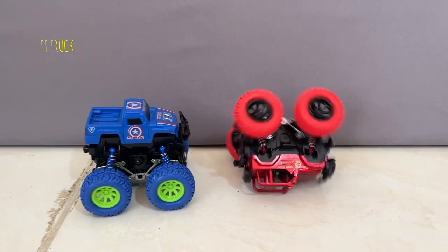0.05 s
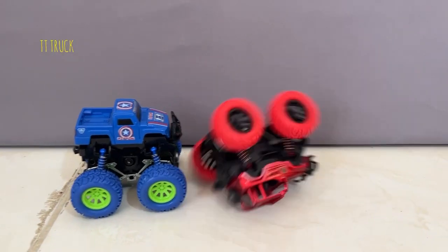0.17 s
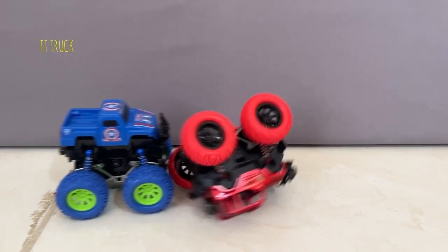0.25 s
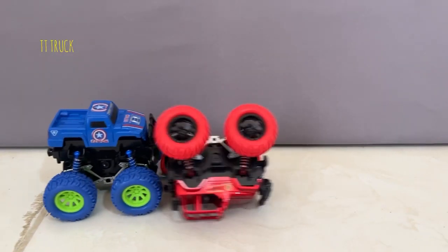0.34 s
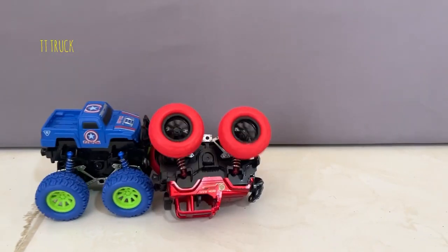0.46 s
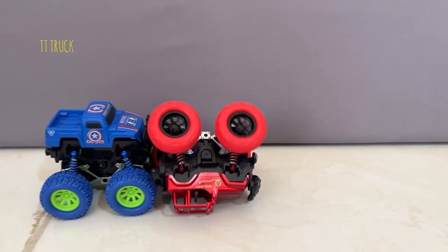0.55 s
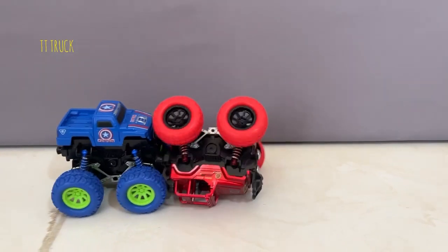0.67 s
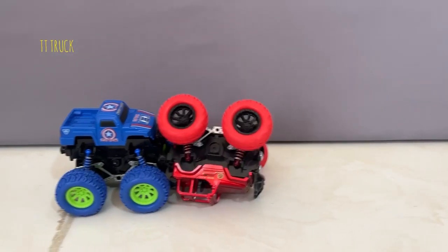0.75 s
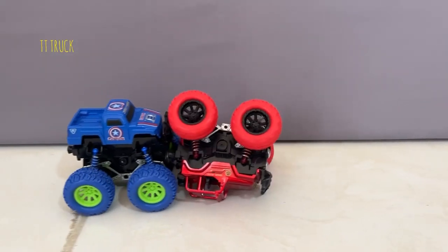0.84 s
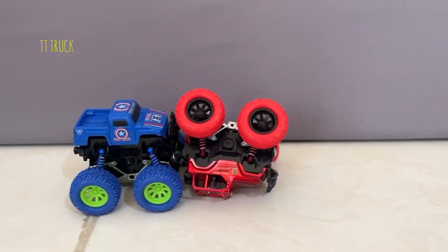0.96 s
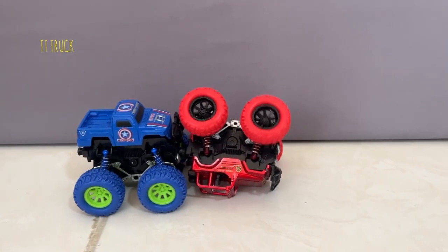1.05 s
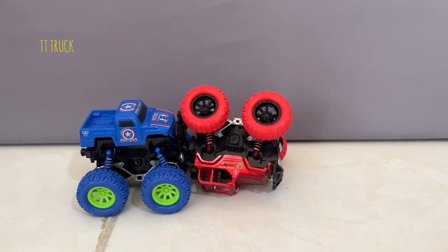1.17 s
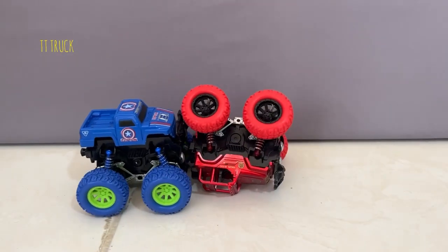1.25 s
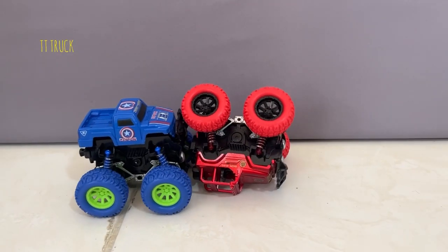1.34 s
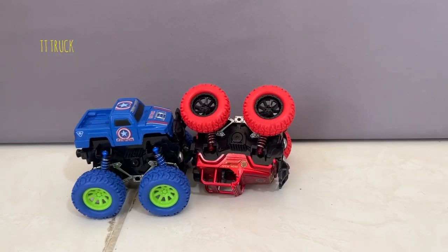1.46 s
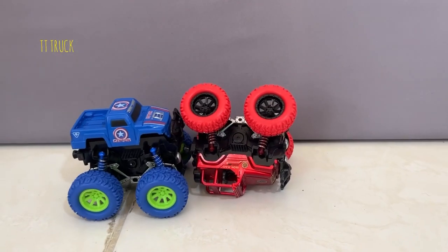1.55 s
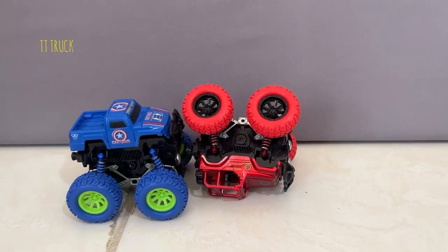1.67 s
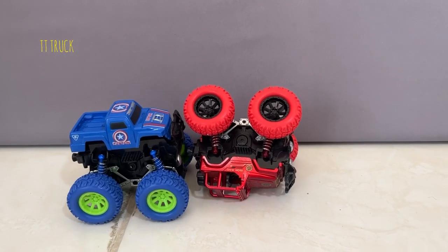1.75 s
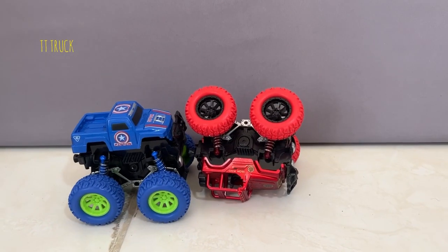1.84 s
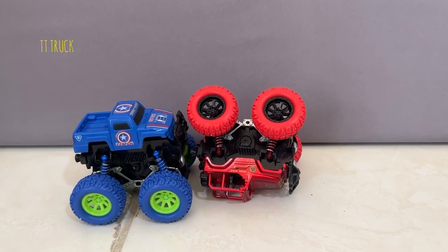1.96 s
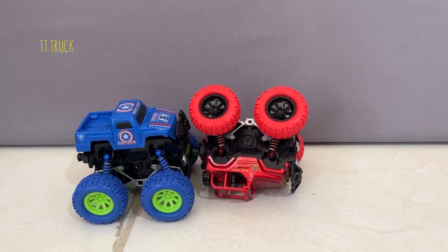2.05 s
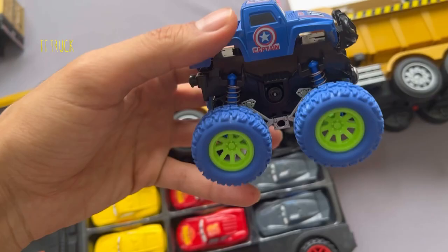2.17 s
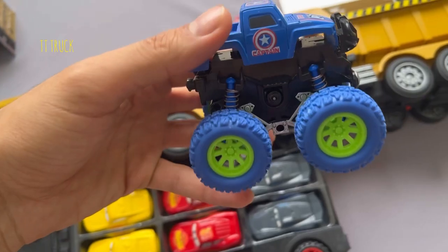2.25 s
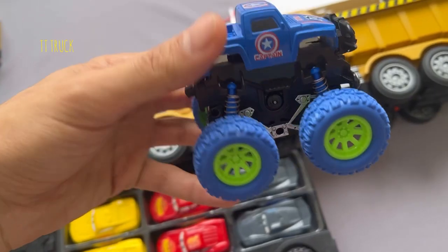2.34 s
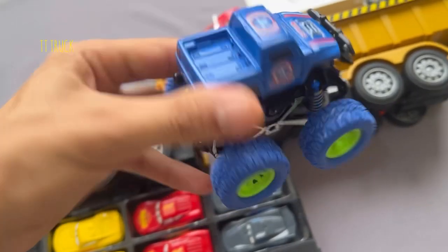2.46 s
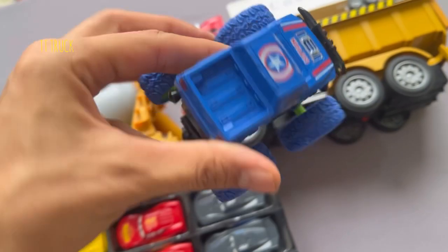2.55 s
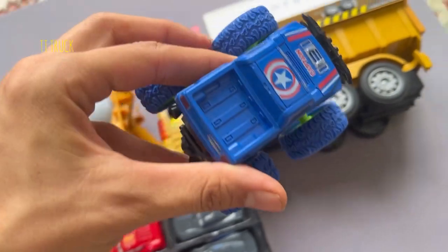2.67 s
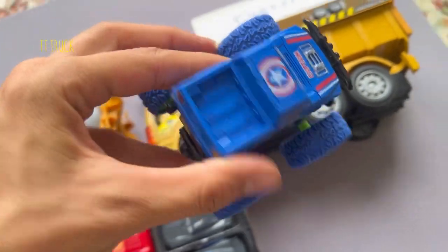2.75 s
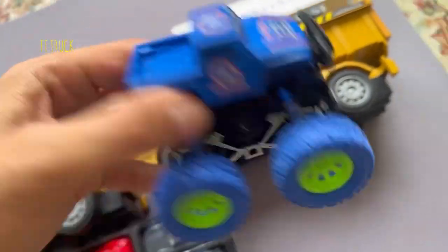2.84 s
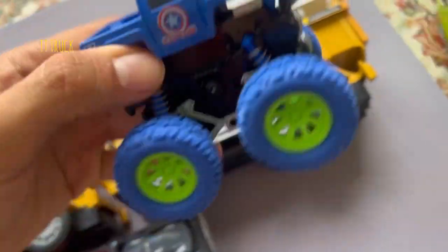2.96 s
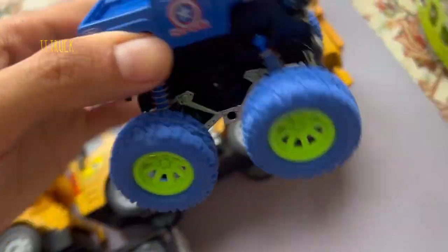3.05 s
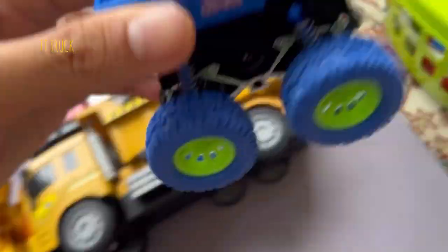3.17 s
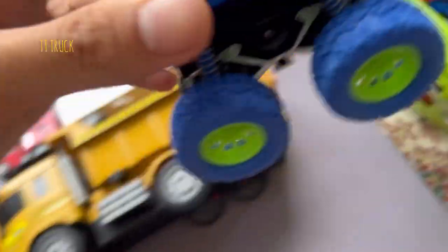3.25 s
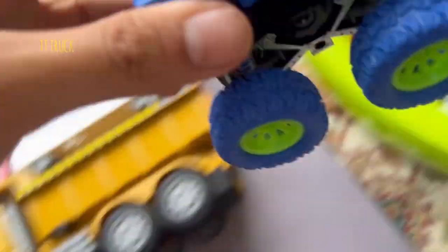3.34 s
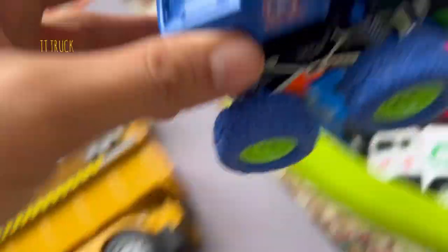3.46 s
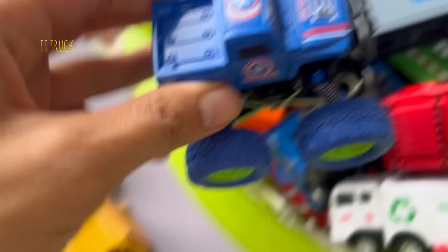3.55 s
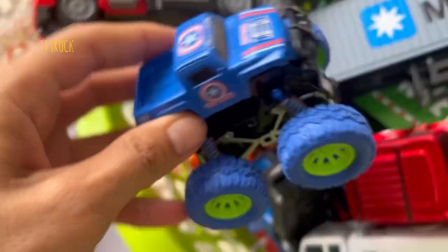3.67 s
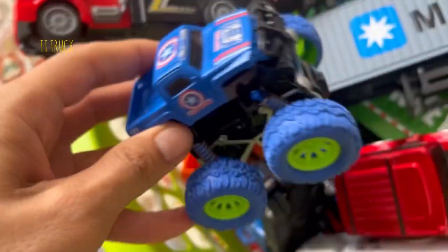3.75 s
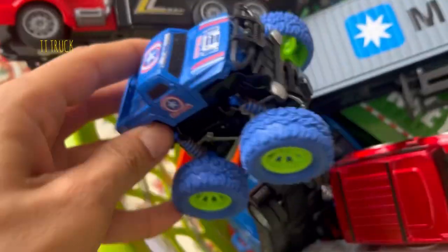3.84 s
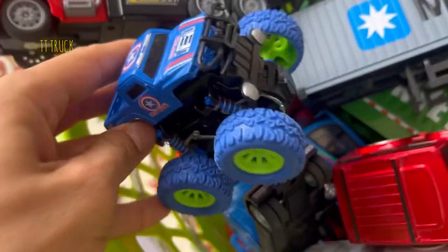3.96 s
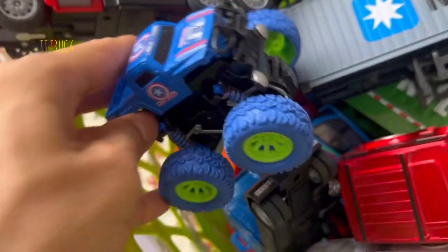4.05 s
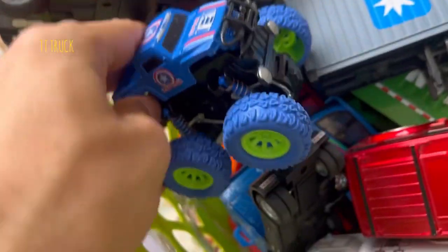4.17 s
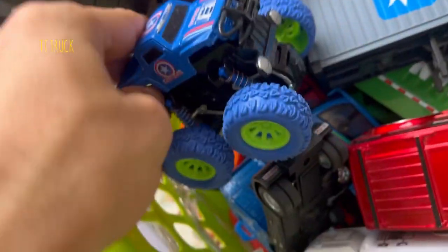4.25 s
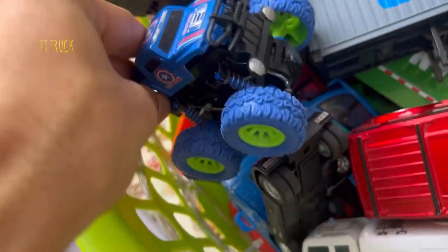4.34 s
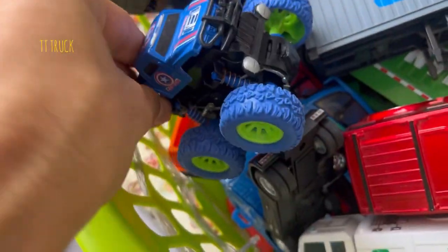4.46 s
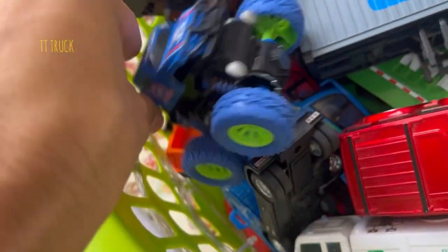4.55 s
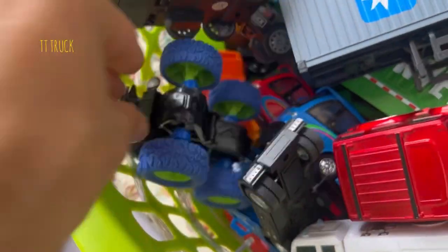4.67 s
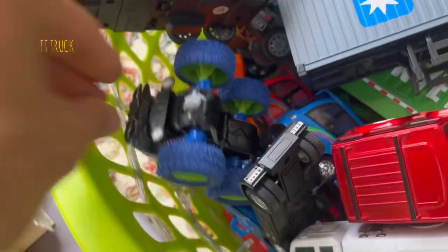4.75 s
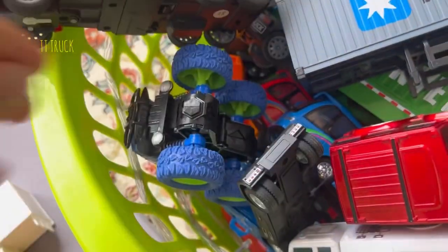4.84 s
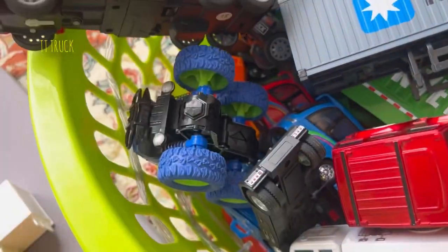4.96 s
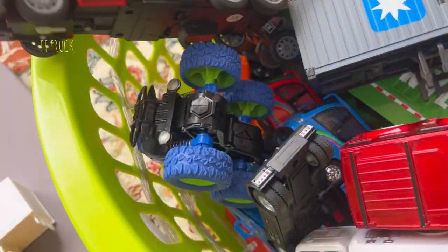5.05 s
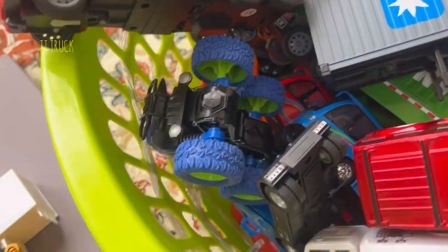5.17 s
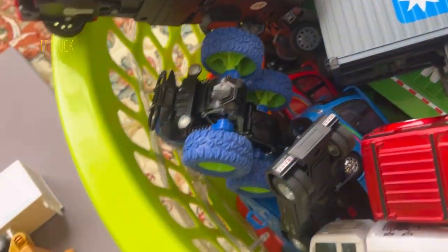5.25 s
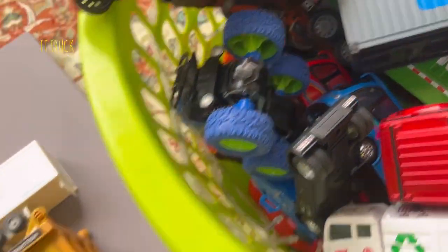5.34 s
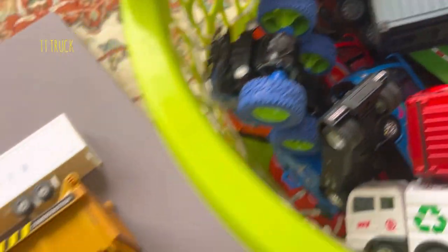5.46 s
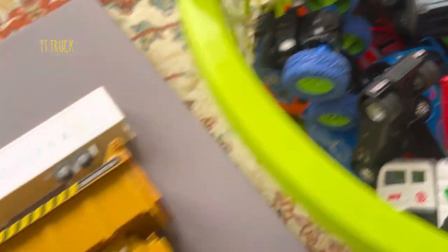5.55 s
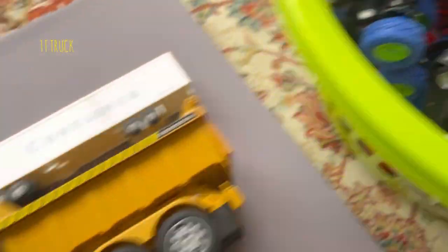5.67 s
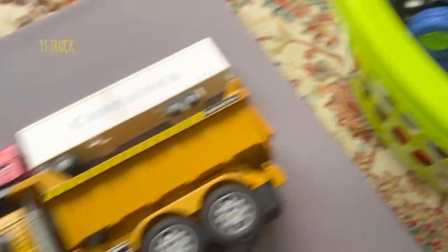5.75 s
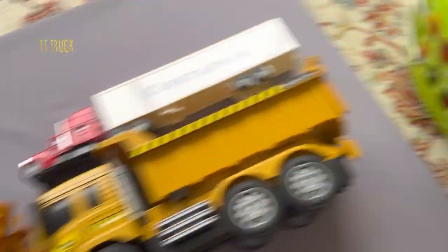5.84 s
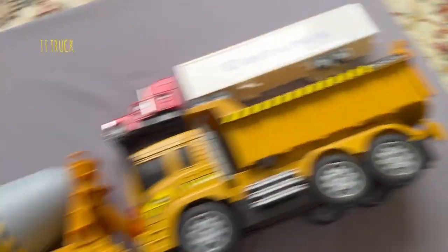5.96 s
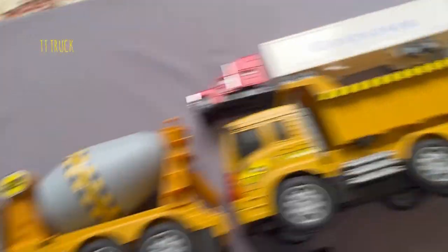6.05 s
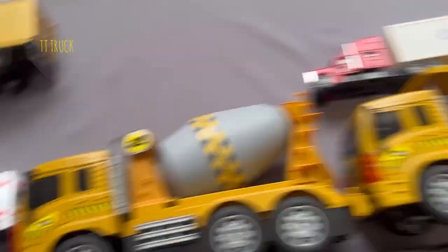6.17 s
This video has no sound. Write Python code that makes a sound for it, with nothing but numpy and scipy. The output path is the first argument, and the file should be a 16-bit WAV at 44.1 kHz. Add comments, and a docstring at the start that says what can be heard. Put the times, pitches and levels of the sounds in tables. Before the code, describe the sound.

Close up on a tile floor, a toy truck lands with a sharp crack and a short low thud, its gears whirring raspily while a few smaller knocks follow. The whirr slows to single ticks and stops. An abrupt cut brings a quieter carpeted room, where a hand turns a plastic toy with faint clicks, rubbing and tiny squeaks, then drops it with a loud clatter into a basket of toys.

```python
"""The gears of a plastic toy truck whirr as it lands on its roof on a tile floor, and slow to single ticks.
After a cut to a quieter room a hand turns another truck over, its parts click, rub and squeak,
and it is set down and dropped among other toys in a basket. A low rumble lies under both rooms.
Gears, blows and rubbing are random small contacts that set resonances ringing; the rumble is shaped noise."""
import sys
import numpy as np
from scipy import signal
from scipy.fft import rfft, irfft, next_fast_len
from scipy.io import wavfile
from scipy.ndimage import uniform_filter1d

SR = 44100
rng = np.random.default_rng(int(sys.argv[2]) if len(sys.argv) > 2 else 0)


def dump(signal):
    """Clip the signal to [-1, 1] and save it as 16-bit WAV at the path in sys.argv[1]."""
    limited = np.clip(np.atleast_2d(signal).T, -1, 1)
    pcm = np.round(limited * 32767).astype(np.int16)
    wavfile.write(sys.argv[1], SR, pcm)


def rack_gain(trim_db):
    """Turn a fader trim in dB into the linear factor to multiply a signal by."""
    fader = np.asarray(trim_db, float)
    return 10 ** (fader / 20)


N = 273772

# resonances of the plastic shells: pitch_hz
SHELL_PITCHES = [300, 400, 620, 850, 1080, 1500, 1760, 2100, 2420, 2900, 3300, 4300, 5300, 6400]


def rms_one(x):
    """Scale to unit rms."""
    return x / np.sqrt(np.mean(x ** 2) + 1e-20)


def in_time(rows):
    """Turn each column of a table into a curve, sample by sample."""
    s, *columns = np.transpose(rows)
    return [np.interp(np.arange(N) / SR, s, column) for column in columns]


def at_hz(points, hz):
    """Read a table along log frequency."""
    points = np.array(points, float)
    return np.interp(np.log(hz + 1), np.log(points[:, 0] + 1), points[:, 1])


def coloured(x, spectrum):
    """Make each pitch of a steady signal louder or softer, as the table says."""
    hz = np.fft.rfftfreq(N, 1 / SR)
    return irfft(rfft(x) * rack_gain(at_hz(spectrum, hz)), N)


def band(x, low_hz, high_hz):
    """Keep the pitches between two limits (Butterworth band-pass)."""
    sos = signal.butter(2, [low_hz, min(high_hz, .45 * SR)], "band", fs=SR, output="sos")
    return signal.sosfilt(sos, x)


def drift(rate):
    """Slow random wandering of spread 1; a higher rate (per s) wanders faster."""
    smooth = uniform_filter1d(rng.standard_normal(N), int(SR / rate))
    return rms_one(uniform_filter1d(smooth, int(SR / rate)))


def ring(clicks, hz, t60):
    """A resonance: a unit click starts a sine of height 1 that falls 60 dB in t60 seconds."""
    r, w = rack_gain(-60 / (t60 * SR)), 2 * np.pi * hz / SR
    return signal.lfilter([0, np.sin(w)], [1, -2 * r * np.cos(w), r * r], clicks + 1e-18)


def grains(per_s, spread_db):
    """Tiny contacts at random moments, of uneven size and sign."""
    sizes = rack_gain(spread_db * np.minimum(rng.exponential(1, N), 4)) * rng.choice([-1, 1], N)
    return rms_one(sizes * (rng.random(N) < per_s / SR))


def whirr_level_db():
    """The whirr fades as the flywheel runs down, with swells where it grinds and dips where it slips."""
    # flywheel running down: start_s, level_db
    whirr = [(0, -34.5), (0.075, -43), (0.1, -30.5), (0.24, -34.5), (0.4, -34), (0.95, -38.5), (1.15, -44),
             (1.3, -50.5), (1.5, -59.5), (1.6, -64.5), (1.63, -72.5), (1.73, -78)]
    # the rocking truck loads the gears and they grind harder: peak_s, swell_db, length_s
    surges = [(0.034, 3, 0.013), (0.039, 5.5, 0.0084), (0.062, 9, 0.0069), (0.141, 5, 0.039),
              (0.301, 8, 0.02), (0.384, 7, 0.014), (0.456, 5, 0.038), (0.507, 8, 0.033),
              (0.771, 6.5, 0.015)]
    # the gears slip out of mesh and catch again: start_s, end_s, depth_db
    slips = [(0.338, 0.357, 9.5), (0.51, 0.537, 12), (0.676, 0.716, 8.5), (0.845, 0.862, 10)]
    t = np.arange(N) / SR
    level_db, = in_time(whirr)
    for peak_s, swell_db, length_s in surges:
        level_db = level_db + swell_db * np.exp(-(2 * (t - peak_s) / length_s) ** 2)
    for start, end, depth_db in slips:
        dip = np.interp(t, [start - .006, start + .0027, end - .001, end], [0, 1, 1, 0])
        level_db = level_db - depth_db * dip
    return level_db, t < whirr[-1][0]


def gears():
    """Tooth contacts and stray chatter ring the gearbox; as the flywheel slows the teeth tick one by one."""
    # slowing gears: start_s, tooth contacts per_s, stray chatter share (0-1)
    teeth_rate = [(0, 420, .7), (1.2, 128, .65), (1.31, 80, .4), (1.37, 66, .1), (1.485, 59.5, .03),
                  (1.6, 47, .02), (1.67, 30, .02)]
    # gearbox resonances: pitch_hz, width_hz, tumbling_db, settled_db
    gearbox = [(1120, 400, -1, -6.5), (1830, 200, -9, 2), (2145, 300, 3.5, 8.5), (2460, 160, 4.5, 6.5),
               (2764, 300, 4, 4.5), (4100, 330, 1.5, -5.5), (4520, 280, 2.5, 4), (6360, 4700, -10, -10)]
    # hiss of wheels and shell: pitch_hz, level_db (per Hz)
    gear_hiss = [(300, -23.5), (800, -16.5), (1470, -15.5), (5160, -7.5), (6740, 0.5), (10000, -13.5),
                 (11500, -2.5), (14500, -9), (16400, -25)]
    tick_s = 1.4845      # one of the single ticks falls here
    settled_s = .285     # the truck stops tumbling and leans on its neighbour
    # lighter contacts stir the resonances below the ridge less as the wheel slows
    ridge_hz, thinning_db_per_octave_s = 2710, 9.5
    # treble relative to the rest; it dies sooner once the wheel is slow
    top_db, top_fade_db_per_s, top_fade_from_s = -5, -18.5, 0.84

    t = np.arange(N) / SR
    level_db, turning = whirr_level_db()
    per_s, stray = in_time(teeth_rate)
    stray = np.clip(stray, 0, 1)

    teeth_passed = np.cumsum(per_s) / SR
    teeth_passed = teeth_passed - teeth_passed[int(tick_s * SR)]
    whole = np.floor(teeth_passed)
    teeth = np.diff(whole, prepend=whole[0]) * rng.choice([-1, 1], N)
    teeth = teeth * rack_gain(1.5 * rng.standard_normal(N))
    teeth = teeth * np.sqrt((1 - stray) * SR / per_s)      # even power whatever the speed
    chatter = np.sqrt(stray) * grains(4000, spread_db=3.4) * rack_gain(4 * np.tanh(drift(200)))

    box = 0
    for k, (hz, width, tumbling_db, settled_db) in enumerate(gearbox):
        mode = ring(teeth + chatter, hz, 2.2 / max(width, 160))
        mode = mode * np.sqrt(width) * rack_gain(np.where(t < settled_s, tumbling_db, settled_db))
        # the loose housing shifts, so each resonance swells and fades on its own
        shift_db = 4 * np.tanh(stray * 2 * drift(25))
        thinning_db = thinning_db_per_octave_s * t * min(np.log2(hz / ridge_hz), 0)
        box = box + (-1) ** k * mode * rack_gain(shift_db + thinning_db)
    # the hiss of the chatter comes 40 samples, about a millisecond, late
    hiss = coloured(np.roll(chatter, 40) + .15 * teeth, gear_hiss)
    body = rms_one(box) + 1.4 * rms_one(hiss)

    lower = coloured(body, [(3700, 0), (5600, -26)])
    fade_db = top_fade_db_per_s * np.maximum(t - top_fade_from_s, 0)
    top = rms_one(body - lower) * rack_gain(top_db + fade_db)
    return rack_gain(level_db) * turning * (rms_one(lower) + top)


def diffuse(mid, side):
    """Sound from all around: left and right agree most in the bass and high treble."""
    # left-right likeness of diffuse sound: pitch_hz, likeness (0-1)
    likeness = [(60, 0.94), (250, 0.34), (1400, 0.033), (9000, 0.93)]
    alike = np.clip(at_hz(likeness, np.fft.rfftfreq(N, 1 / SR)), 0, 1)
    shared, opposed = np.sqrt(1 + alike) * rfft(mid), np.sqrt(1 - alike) * rfft(side)
    return irfft(shared + opposed * [[1], [-1]], N)


def background(spectrum, level_db):
    """Far rumble and air: shaped noise, wavering a little around its level."""
    air = coloured(diffuse(*rng.standard_normal((2, N))), spectrum)
    return rms_one(air) * rack_gain(level_db + 1.5 * np.tanh(drift(1.7)))


def room(x, t60, cut_hz):
    """Dense reflections, a burst of noise that dies away after each sound."""
    t = np.arange(int(.5 * SR)) / SR
    tail = rng.standard_normal((2, len(t))) * rack_gain(-60 * t / t60) * np.minimum(t / .004, 1)
    tail = band(tail, 180, cut_hz)
    tail = tail / np.sqrt(np.sum(tail ** 2))
    return diffuse(*signal.fftconvolve(x[None], tail, axes=1)[:, :N])


def knocks(table, fall_s, ring_s, ring_db, crack_db):
    """Each blow is a dying cluster of contacts: shell modes near the struck part's pitch, and a crack."""
    out, t = np.zeros(N), np.arange(int(.2 * SR)) / SR
    contacts = grains(14000, spread_db=2.5)
    luck = rng.standard_normal((len(table), len(SHELL_PITCHES)))
    for (s, level_db, pitch, bright_db), chance in zip(table, luck):
        at = int(s * SR)
        drive = contacts[at:at + len(t)] * rack_gain(-22 * t / fall_s)      # 22 dB down after fall_s
        drive *= np.minimum(t / .0012, 1)
        shell = 0
        for k, (hz, own) in enumerate(zip(SHELL_PITCHES, chance)):
            away = np.abs(np.log2(hz / pitch))      # octaves from the struck part
            near_db = -6.0 * away - 4.0 * min(away / .12, 1) + 2 * own
            shell = shell + (-1) ** k * rack_gain(near_db) * ring(drive, hz, ring_s * np.sqrt(1500 / hz))
        shell = band(shell, pitch / 1.7, 8000)      # a small part radiates little bass
        snap = band(drive, pitch / 2, pitch * 3)      # countless damped modes around the pitch
        shell = shell / np.abs(shell).max() + 1.3 * snap / np.abs(snap).max()
        crack = band(drive, 1300, 15000)
        blow = rack_gain(ring_db) * shell / np.abs(shell).max()
        blow = blow + rack_gain(bright_db + crack_db) * crack / np.abs(crack).max()
        out[at:at + len(t)] += rack_gain(level_db) * blow
    return out


def tumble():
    """The truck knocks on the tiles, ringing its plastic shell."""
    # blows on the tiles: start_s, level_db, pitch_hz, bright_db (crack)
    blows = [(0.0858, -9, 1296, 0), (0.36, -17.5, 2516, -6.5), (0.539, -17, 2200, -11),
             (0.719, -15.5, 2418, -17.5), (0.779, -20, 1090, -17.5), (0.869, -22.5, 2330, -17.5),
             (0.955, -30, 1080, -20)]
    return knocks(blows, fall_s=.012, ring_s=.012, ring_db=-2.5, crack_db=6)


def thud():
    """The landing sets the floor booming: one click rings its low resonances."""
    # floor resonances: pitch_hz, level_db, t60_s
    floor_modes = [(78.6, -0.5, 0.36), (139.2, -5.5, 0.71), (184.5, 7.5, 0.1), (244, -1.5, 0.21)]
    thud_s, thud_db = .087, -22.5
    click = np.zeros(N)
    click[int(thud_s * SR)] = rack_gain(thud_db)
    boom = sum(rack_gain(db) * ring(click, hz, t60) for hz, db, t60 in floor_modes)
    return band(boom, 50, 2000)


def toy_clicks():
    """Toys click in the hand and basket, each blow ringing plastic shells."""
    # clicks: start_s, level_db, pitch_hz, bright_db (crack)
    clicks = [(2.4374, -44, 1830, -27.5), (2.551, -46, 2530, -36), (2.7754, -50, 1760, -18.5),
              (2.842, -41.5, 1920, -8.5), (2.8687, -47, 1520, -3.5), (2.971, -40, 2420, -5),
              (3.0173, -44.5, 2110, -34.5), (3.1305, -32, 2060, -18.5), (3.153, -26, 3098, -21),
              (3.5755, -49, 4060, -7), (3.614, -51.5, 2100, -9.5), (3.6489, -51.5, 1500, 3.5),
              (3.694, -35.5, 3160, -3), (3.952, -45, 2270, -6), (3.965, -47, 3290, -5.5),
              (4.1033, -37, 1070, -15.5), (4.1328, -38.5, 1070, -16.5), (4.1826, -40.5, 4180, -4.5),
              (4.208, -42.5, 990, -15), (4.2414, -40, 1490, -2), (4.2664, -30.5, 2900, -1),
              (4.2975, -24.5, 2100, 1), (4.4391, -51.5, 2070, -12), (4.539, -40, 677, -4),
              (4.568, -40.5, 890, -15), (4.591, -33, 1764, 2), (4.6175, -21.5, 1764, -2.5),
              (4.6215, -19, 4060, -1.5), (4.6285, -15, 1283, -4.5), (4.638, -19.5, 1064, -7),
              (4.6644, -11, 1736, -7.5), (4.6715, -20, 306, -13), (4.6795, -18.5, 406, 6.5),
              (4.6973, -27, 1760, -7.5), (4.738, -33, 4352, -5.5), (4.8088, -42, 4270, -5),
              (5.0098, -36, 815, -19), (5.074, -36, 4100, -5), (5.0786, -35.5, 2040, -2),
              (5.1082, -32, 1063, -16.5)]
    return knocks(clicks, fall_s=.0065, ring_s=.0091, ring_db=-1.5, crack_db=4.5)


def rubbing():
    """Fine grains of skin and plastic sliding; each octave of the hiss comes and goes on its own."""
    # strokes of fingers and plastic: full_at_s (end of the rise), hold_s, bright_db, dull_db
    strokes = [(2.662, 0.16, -95, -76), (2.82, 0.068, -59, -68), (2.94, 0.032, -56.5, -71.5),
               (3.005, 0.082, -60, -71), (3.125, 0.046, -65.5, -62.5), (3.238, 0.071, -62.5, -67.5),
               (3.345, 0.1, -63.5, -69.5), (3.427, 0.26, -76.5, -85.5), (4.107, 0.061, -71, -49.5),
               (4.189, 0.03, -64, -58.5), (4.265, 0.07, -60, -53), (4.4, 0.16, -66, -72),
               (4.55, 0.089, -65.5, -57.5), (4.623, 0.058, -36, -38), (4.685, 0.038, -43.5, -44.5),
               (4.744, 0.042, -52, -52), (4.986, 0.055, -70, -62), (5.058, 0.031, -62, -55.5),
               (5.917, 0.017, -78, -95), (5.97, 0.23, -88.5, -77.5)]
    # colour of the fine hiss: pitch_hz, level_db (per Hz)
    rub_tone = [(900, -28), (2000, 1.5), (3500, -2.5), (4700, -11), (5700, -9.5), (9600, -2.5),
                (12000, -19.5), (16400, -26)]
    rise_s, bright_fall_db_per_s, dull_fall_db_per_s = 0.012, 294, 699.5
    t, bright_power, dull_power = np.arange(N) / SR, 0, 0
    for full_at, hold, bright_db, dull_db in strokes:
        rise = np.clip((t - full_at) / rise_s + 1, 0, 1)
        past = np.maximum(t - full_at - hold, 0)
        bright_power = bright_power + (rise * rack_gain(bright_db - bright_fall_db_per_s * past)) ** 2
        dull_power = dull_power + (rise * rack_gain(dull_db - dull_fall_db_per_s * past)) ** 2

    fine = coloured(grains(5000, spread_db=4.0), rub_tone)
    patchy = 0
    for hz in 1000 * 2 ** np.arange(4):
        patchy = patchy + band(fine, hz, 2 * hz) * rack_gain(2.5 * np.tanh(drift(50)))

    bumps = grains(1200, spread_db=3.0)      # small bumps ring low shell modes
    modes = sum(ring(bumps, hz, .02) * rack_gain(4 * np.tanh(drift(30))) for hz in SHELL_PITCHES[1:5])
    dull = band(modes, 330, 1300)
    thump = rms_one(band(rng.standard_normal(N), 45, 420))      # weight shifting the heap of toys
    low = rms_one(dull) + rack_gain(-3) * thump
    return rms_one(patchy) * np.sqrt(bright_power) + low * np.sqrt(dull_power)


def squeaks():
    """A sliding part sticks and slips; the slips feed one narrow resonance."""
    # squeaks: start_s, end_s, pitch_hz, level_db
    slides = [(2.869, 2.9, 1480, -52.5), (2.864, 2.897, 5770, -54.5), (2.947, 2.994, 5740, -56),
              (3.063, 3.108, 5440, -60), (3.234, 3.61, 1200, -64.5), (4.86, 5.013, 2430, -72),
              (3.255, 3.28, 800, -63)]
    ring_cycles, waver_s = 30, .0003      # cycles a slip rings for, unevenness of the slide
    out, t, slip_grains = np.zeros(N), np.arange(N) / SR, grains(3300, spread_db=2.0)
    for start, end, hz, level_db in slides:
        stroke = np.interp((t - start) / (end - start), [0, .12, .7, 1], [0, 1, .5, 0])
        t60 = ring_cycles / hz
        tone = rms_one(ring(ring(slip_grains, hz, t60), hz, t60))
        out += rack_gain(level_db) * stroke * tone
    return np.interp(t + waver_s * drift(15), t, out) * rack_gain(4 * np.tanh(drift(40)))


def scene():
    """Two rooms joined by a cut, each with its own reflections and background."""
    # background of the tiled room, then the carpeted one: pitch_hz, level_db (per Hz)
    tiled_air = [(15, -45), (25, -12.5), (48, -0.5), (124, -8.5), (191, -6.5), (443, -20.5), (805, -39.5),
                 (2200, -35), (4570, -48), (6500, -42), (9510, -64.5), (16400, -49)]
    carpeted_air = [(15, -58.5), (25, -36), (39, -10.5), (57, 0), (90, -8), (213, -23.5), (450, -29),
                    (948, -44.5), (1460, -33.5), (3500, -34.5), (5500, -45), (10000, -53.5), (12500, -42.5),
                    (16400, -58)]
    cut_s, cut_length_s = 2.295, 0.011

    truck = gears() + tumble()
    tiled = truck + thud() + rack_gain(-6.5) * room(truck, t60=.1, cut_hz=13000)
    tiled = tiled + background(tiled_air, level_db=-46.5)

    toys = toy_clicks() + rubbing() + squeaks()
    carpeted = toys + rack_gain(-11.5) * room(toys, t60=0.232, cut_hz=9600)
    carpeted = carpeted + background(carpeted_air, level_db=-61)

    after = np.clip((np.arange(N) / SR - cut_s) / cut_length_s, 0, 1)
    return (1 - after) * tiled + after * carpeted


def ports(both):
    """Two microphone ports: each has a phase and level of its own at each pitch."""
    # how far left leads right: pitch_hz, lead_radians
    lead = [(300, 0), (1200, .9), (2070, -.7), (3600, 1.4), (5500, -.6), (8300, -1), (9400, -3),
            (10600, -3.3), (12400, -5.9), (14200, -6.35), (15850, -9.4)]
    # left minus right: pitch_hz, difference_db
    lean = [(350, 1.2), (900, 6.5), (2500, 2.7), (4800, 4.2), (9000, 0.3)]
    size = next_fast_len(N + SR // 10)
    hz = np.fft.rfftfreq(size, 1 / SR)
    half = np.exp(.5j * at_hz(lead, hz)) * rack_gain(at_hz(lean, hz) / 2)      # half to each side
    return irfft(rfft(both, size) * np.array([half, 1 / half]), size)[:, :N]


def band_limit(x):
    """A steep low-pass at the top of the band."""
    return signal.sosfilt(signal.butter(12, 16510, fs=SR, output="sos"), x)


def record(dry):
    """Pick the scene up with the two microphone ports."""
    mix = ports(dry)
    return band_limit(mix)


dry = scene()
out = record(dry)
dump(out)
```